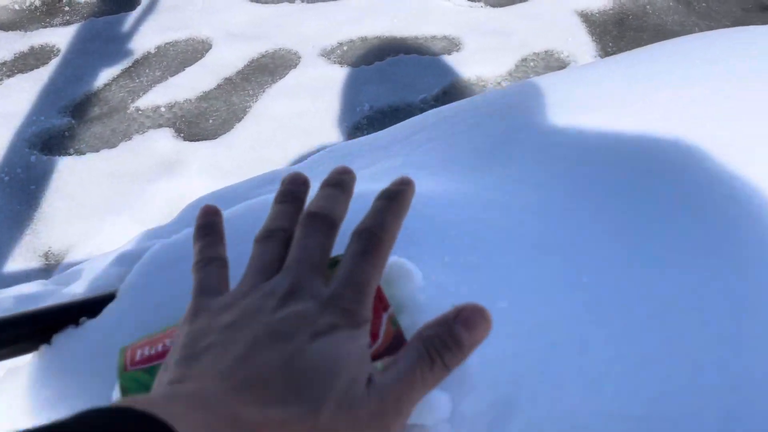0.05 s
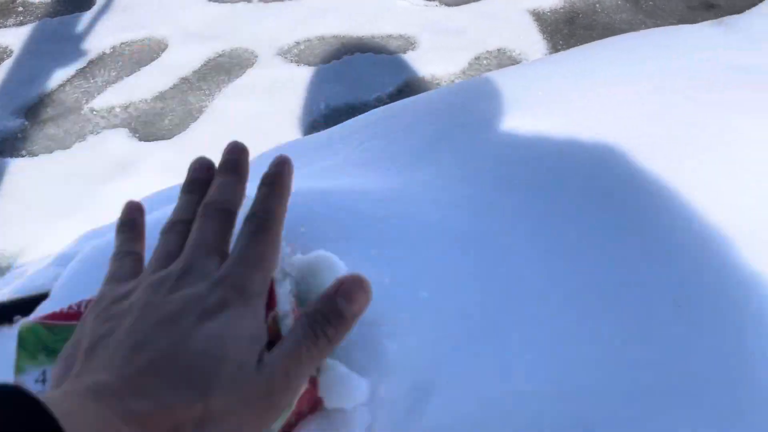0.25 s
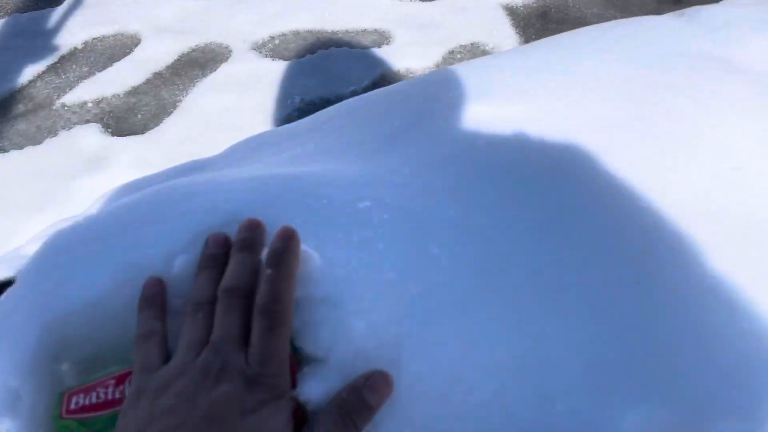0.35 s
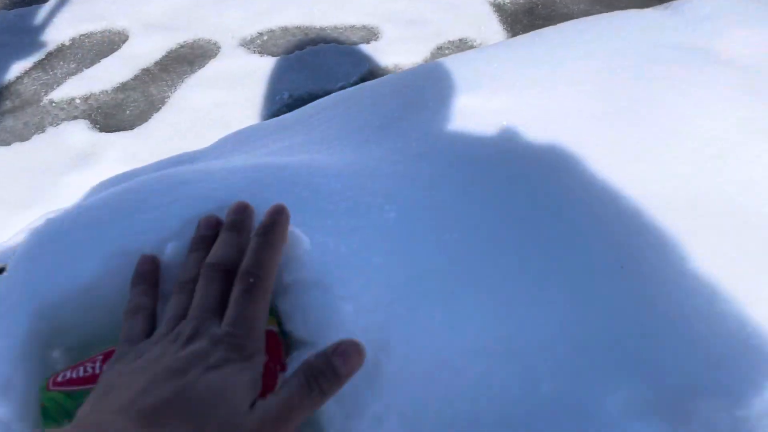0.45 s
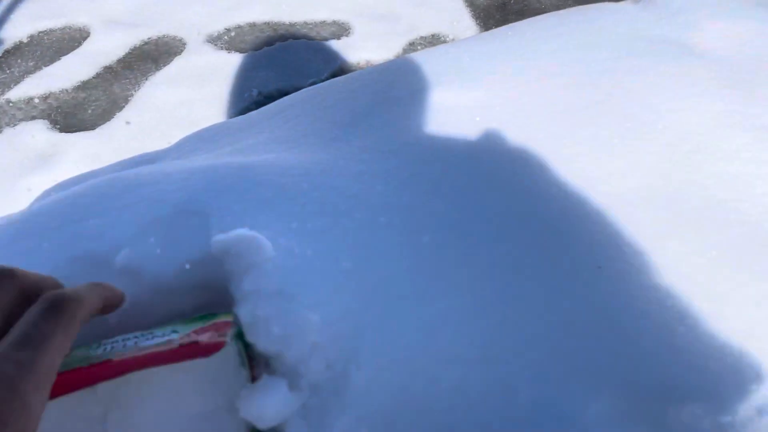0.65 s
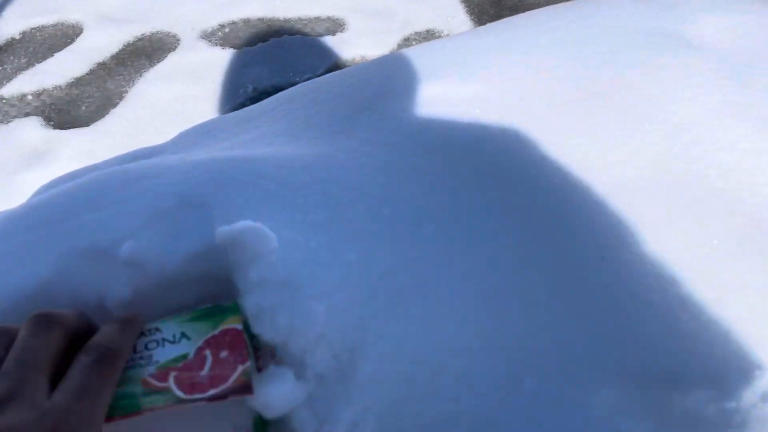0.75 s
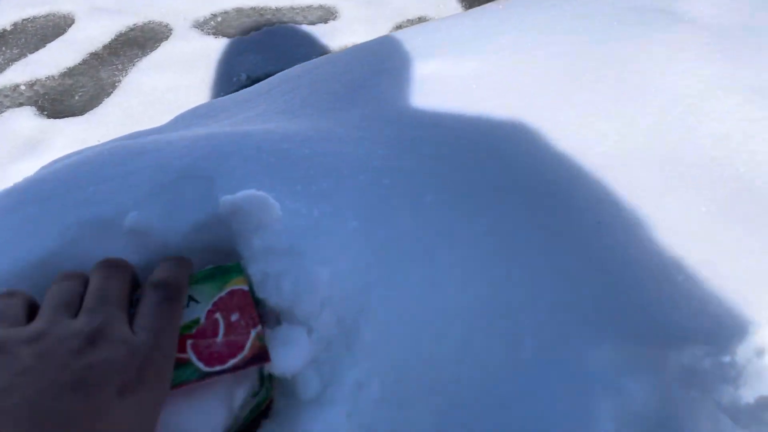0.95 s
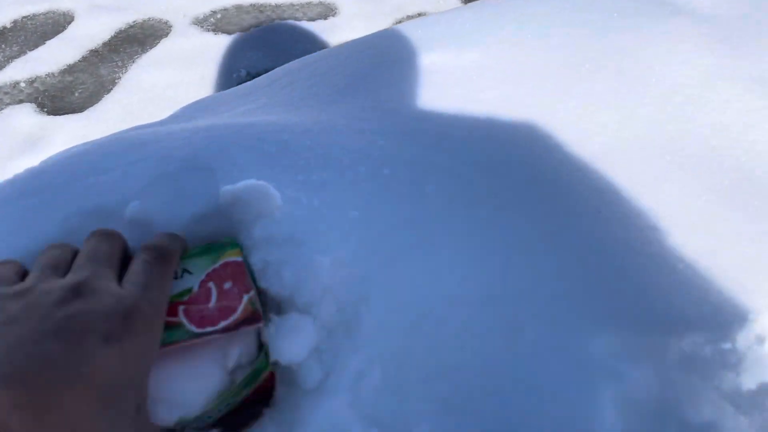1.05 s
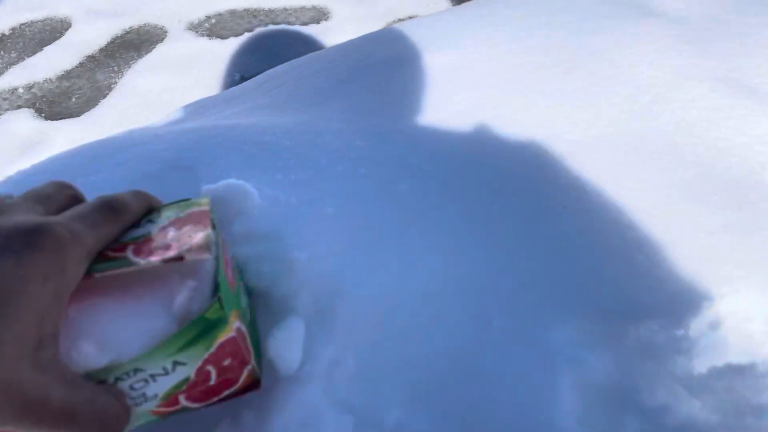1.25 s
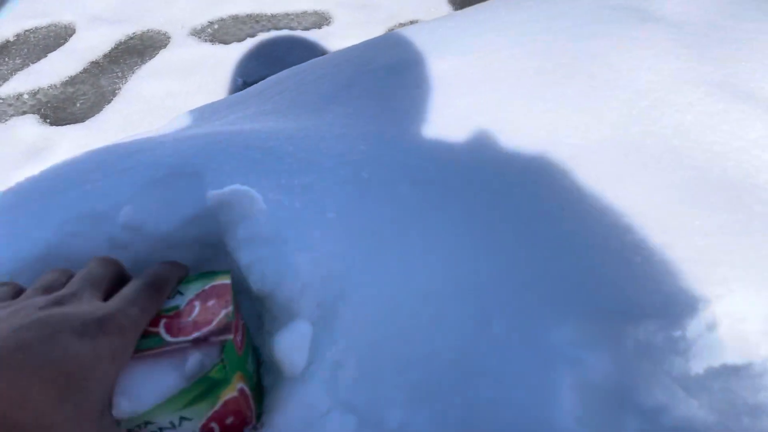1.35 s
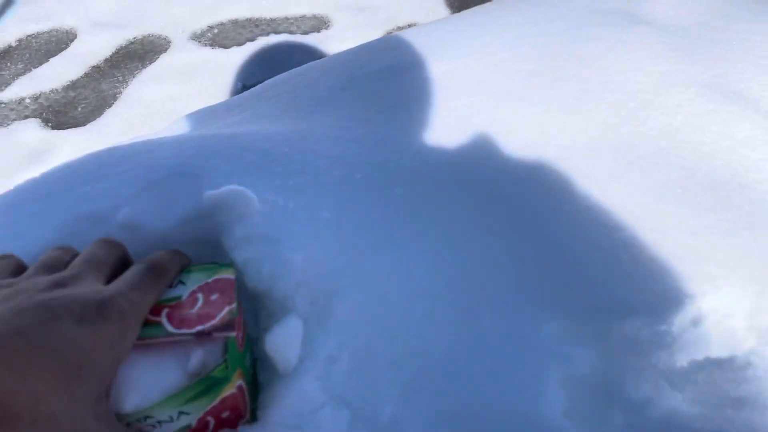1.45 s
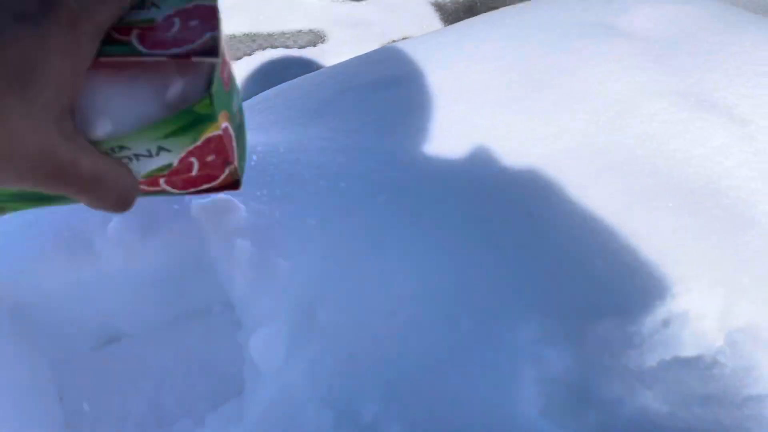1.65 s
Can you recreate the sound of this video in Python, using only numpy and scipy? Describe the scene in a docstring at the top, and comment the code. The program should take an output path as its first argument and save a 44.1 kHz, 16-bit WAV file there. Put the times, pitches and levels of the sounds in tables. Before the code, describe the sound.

Crunching and scraping as a cardboard carton is pushed into crusted snow by hand.

```python
"""A hand works a small carton into crusted snow, in the open air, near two closely spaced microphones.
First the cardboard snaps and slides lightly. A quarter of a second in comes a hard shove: a swarm of ice
grains breaks, hissing and rattling the panels, and the hollow box thumps against the packed snow.
Softer strokes then shift the carton, with scattered snaps. From about 1.25 seconds it is pressed down
with another crunch and a few last thumps."""
import sys
import numpy as np
from scipy import signal
from scipy.fft import rfft, irfft, next_fast_len
from scipy.io import wavfile
from scipy.ndimage import map_coordinates

SR = 44100
rng = np.random.default_rng(int(sys.argv[2]) if len(sys.argv) > 2 else 0)


def waveform_to_disk(signal):
    """Save audio, clipped to [-1, 1], as 16-bit WAV at the path in sys.argv[1]."""
    frames = np.transpose(np.atleast_2d(signal))
    scaled = np.clip(frames, -1, 1) * 32767
    samples = np.round(scaled).astype(np.int16)
    wavfile.write(sys.argv[1], SR, samples)


N = 74970

# The tone colour of breaking ice. Each row: frequency in Hz, relative level in dB.
ICE_SPECTRUM = [(100, -37), (500, -16.5), (1600, 1.5), (2600, -0.5), (4400, 1), (5900, -6), (7500, 0),
                (9700, 1), (11800, -7.5), (15000, -3.5)]
# The pitches at which the cardboard panels ring. Each row: frequency in Hz, width in Hz, boost in dB.
PANEL_RESONANCES = [(227.2, 13, 0), (305, 150, -3.5), (778, 52, 1.5), (952, 26, 5), (1155, 24, 1),
                    (1674, 76, 3.5), (1874, 18, 3), (2500, 60, 7), (3485, 130, 1.5), (4450, 170, 5.5)]


def amp(db):
    """Turn decibels into a number to multiply by."""
    return 10 ** (np.asarray(db) / 20)


def unit(x):
    """Scale x so that its average power is 1."""
    return x / np.sqrt(np.mean(x ** 2) + 1e-20)


def along(points, hz):
    """Read between (Hz, value) points on a logarithmic frequency scale."""
    freqs, values = np.transpose(points)
    return np.interp(np.log(hz + 1), np.log(freqs + 1), values)


def level(points):
    """Join (seconds, dB) points into a gain for every sample."""
    return amp(np.interp(np.arange(N) / SR, *np.transpose(points)))


def since(start):
    """Seconds gone by since start, zero before it."""
    return np.maximum(np.arange(N) / SR - start, 0)


def wobble(per_s):
    """A smooth curve through per_s random values each second."""
    return map_coordinates(rng.standard_normal(N), [np.arange(N) * per_s / SR])


def filtered(x, response):
    """Change the level and phase of each frequency in x by response(hz)."""
    size = next_fast_len(N + SR // 2)
    return irfft(rfft(x, size) * response(np.fft.rfftfreq(size, 1 / SR)), size)[..., :N]


def coloured(x, spectrum, resonances=(), size=8192):
    """Give x a tone colour and resonances, using a filter that keeps the power of white noise."""
    hz = np.fft.rfftfreq(size, 1 / SR)
    boost_db = sum(db / (1 + (2 * (hz - centre) / width) ** 2) for centre, width, db in resonances)
    cepstrum = irfft(np.log(amp(along(spectrum, hz) + boost_db)))
    # Folding this onto its first half makes the filter ring after a click, never before it.
    cepstrum[1:size // 2] *= 2
    cepstrum[size // 2 + 1:] = 0
    response = irfft(np.exp(rfft(cepstrum)))
    return signal.fftconvolve(x, response[None] / np.linalg.norm(response), axes=1)[:, :N]


def grains(per_s, spread_db):
    """Tiny random clicks in two rows: the part both microphones share, and the off-centre part."""
    sizes = amp(spread_db * np.clip(rng.standard_normal(N), -2, 2))
    signs = rng.choice([-1, 1], N)
    clicks = unit(sizes * signs * (rng.random(N) < per_s / SR))
    return np.array([clicks, clicks * rng.standard_normal(N)])


def ring(start, hz, fade_s, attack_s):
    """One vibration that fades by 60 dB in fade_s seconds, with no off-centre part."""
    t = since(start)
    envelope = amp(-60 * t / fade_s) * (1 - np.exp(-t / attack_s))
    return np.outer([1, 0], np.sin(2 * np.pi * hz * t) * envelope)


def hand_rumble():
    """The hand holding the box makes a low rumble."""
    # How the rumble swells and sinks. Each row: time in seconds, level in dB.
    loudness = [(0, -61), (0.1, -53), (0.2, -54.5), (0.29, -31.5), (0.49, -32), (0.56, -41), (0.65, -48),
                (0.75, -51), (0.81, -57), (1.03, -45.5), (1.15, -55.5), (1.3, -49.5), (1.47, -52.5),
                (1.6, -41.5), (1.7, -66)]
    # Its deep tone colour. Each row: frequency in Hz, relative level in dB.
    spectrum = [(20, -18), (45, -8), (70, 2), (110, -6.5), (200, -12.5), (400, -26.5), (2000, -60.5)]
    return level(loudness) * coloured(rng.standard_normal((2, N)), spectrum)


def sliding():
    """Cardboard and fingers rub lightly over loose snow, and single crumbs crackle."""
    # How strong the sliding is. Each row: time in seconds, level in dB.
    loudness = [(0, -50), (0.08, -51), (0.2, -62.5), (0.3, -46.5), (0.53, -51), (0.63, -48.5), (0.72, -54),
                (0.93, -45.5), (1.1, -52.5), (1.21, -53.5), (1.36, -47.5), (1.43, -58), (1.52, -60),
                (1.61, -62.5), (1.7, -64)]
    # The tone colours of rubbing and of crumbs. Each row: frequency in Hz, relative level in dB.
    rub_spectrum = [(60, -11), (300, 8), (900, 1.5), (1700, -1.5), (2400, -1), (4200, -5), (6500, -6),
                    (9500, -10), (12000, -7.5), (15500, -10)]
    crumb_spectrum = [(200, -29), (900, -1), (1700, 8.5), (2500, -12), (3800, 0), (6000, -8), (10000, -18),
                      (15000, -14)]
    pressure = level(loudness) * amp(1.4 * wobble(per_s=90))
    rub = coloured(pressure * grains(per_s=5400, spread_db=4), rub_spectrum, PANEL_RESONANCES)
    crumbs = coloured(pressure * grains(per_s=130, spread_db=6), crumb_spectrum)
    return rub + amp(-7.5) * crumbs


def thumps():
    """The box bumps on packed snow, and each bump rings briefly at a low pitch."""
    # Each row: start in seconds, level in dB, pitch in Hz, seconds to fade by 60 dB.
    bumps = [ (0.249, -16.5, 119, 0.13), (0.263, -12, 90, 0.15), (0.328, -17, 85, .16),
             (0.372, -18, 82, 0.19), (0.456, -22.5, 116.4, 0.25), (0.495, -17, 82, 0.087),
             (0.577, -34, 65, 0.4), (1.328, -29.5, 65.4, 0.16), (1.462, -31, 74, .08),
             (1.52, -20, 145, 0.056), (1.554, -27, 110, 0.076), (1.599, -39, 174.2, 0.08),
             (1.612, -31, 71, 0.071)]
    return sum(amp(db) * ring(start, hz, fade_s, attack_s=0.0051) for start, db, hz, fade_s in bumps)


def snaps():
    """A panel or a piece of crust gives way: a short crack and a ring that dies quickly."""
    # Each row: start in seconds, crack in dB, ring in dB, ring pitch in Hz, seconds to fade by 60 dB.
    breaks = [ (0.0155, -21.5, -7.5, 1530, 0.0035), (0.0418, -26.5, -21, 2050, 0.0086),
              (0.056, -38, -58, 3600, .006), (0.086, -53, -37, 1550, 0.012), (0.124, -56, -34, 1450, .008),
              (0.2476, -8.5, -7.5, 303, 0.06), (0.252, -7, -12, 957, 0.047),
              (0.2665, -10, -22, 1300, 0.0052), (0.323, -49, -24, 640, .02),
              (0.358, -29, -19.5, 1850, 0.0069), (0.395, -26.5, -35, 1780, 0.0049),
              (0.4443, -47, -28, 1540, 0.021), (0.452, -56, -29.5, 840, .016),
              (0.476, -37, -29, 3560, 0.0089), (0.538, -33, -35, 1710, 0.012),
              (0.7771, -37, -29.5, 1120, 0.0073), (0.794, -54, -32.5, 780, 0.022),
              (0.8175, -50, -31, 1530, 0.0072), (0.822, -48, -22.5, 950, 0.023),
              (0.8245, -52, -22, 683, 0.022), (0.9653, -20, -11, 3400, 0.0038),
              (0.9777, -45, -12, 2400, 0.0086), (1.009, -33, -10.5, 2440, 0.0074),
              (1.0096, -25, -26.5, 410, 0.047), (1.012, -39, -19, 1070, 0.018),
              (1.0137, -30, -7, 2350, 0.011), (1.273, -24, -22, 1110, 0.011),
              (1.3301, -17, -41, 1596, .006), (1.3388, -16, -20.5, 607, 0.011),
              (1.4166, -35, -59, 1500, .008), (1.4882, -41, -35.5, 750, 0.011),
              (1.492, -61, -32.5, 362, 0.017), (1.526, -65, -38, 290, 0.067),
              (1.5413, -26.5, -27, 1560, 0.0054), (1.582, -22.5, -30, 1617, 0.029),
              (1.589, -53, -24, 1675, .016)]
    crack_fade_s = 0.0075
    crack_level, rings = np.zeros(N), np.zeros((2, N))
    for start, crack_db, ring_db, hz, fade_s in breaks:
        age = since(start)
        crack_level += amp(crack_db - 60 * age / crack_fade_s) * (age > 0)
        rings += amp(ring_db) * ring(start, hz, fade_s, attack_s=0.00027)
    return coloured(crack_level * rng.standard_normal((2, N)), ICE_SPECTRUM) + rings


def strokes():
    """Each shaky push crushes ice grains and rattles the panels and the hollow of the carton."""
    # Each row: time of full force, then rise, hold and fall, all in seconds,
    # then the levels of ice crunch, cardboard rattle and hollow body in dB.
    pushes = [ (0.234, 0.0099, 0.011, .02, -24.5, -27, -28),
              (0.248, 0.012, 0.012, 0.021, -16.5, -15.5, -19.5),
              (0.266, 0.0093, 0.015, 0.082, -24.5, -32.5, -42), (0.321, .008, .035, .014, -38, -41, -39.5),
              (0.433, 0.1, 0.046, 0.079, -48.5, -49, -63), (0.45, 0.0087, 0.043, 0.038, -67, -40, -29.5),
              (0.535, .012, .01, 0.026, -46.5, -52, -51), (0.734, 0.12, .03, 0.12, -45.5, -59, -55),
              (0.775, 0.0045, 0.03, 0.019, -45, -46, -57), (0.818, 0.0071, 0.0098, 0.02, -41.5, -37.5, -50),
              (0.871, 0.019, 0.044, 0.034, -45.5, -44, -48.5), (0.966, 0.0044, 0.018, 0.016, -32, -36, -65),
              (1.007, 0.0026, 0.0095, 0.014, -27, -36.5, -42.5),
              (1.022, 0.014, 0.0034, 0.11, -50, -46.5, -53), (1.162, 0.11, .012, 0.026, -41, -60.5, -59),
              (1.256, 0.039, .023, .02, -33.5, -45, -70), (1.279, 0.0055, 0.0098, 0.044, -21, -36.5, -58),
              (1.297, 0.012, 0.0055, 0.053, -27.5, -34, -38.5),
              (1.332, 0.0017, 0.009, 0.026, -37, -37, -61), (1.45, 0.023, 0.041, 0.025, -51.5, -55, -58),
              (1.552, 0.02, 0.018, 0.025, -33, -56, -47.5), (1.58, .004, 0.011, 0.01, -34, -53.5, -59)]
    # The tone colours of the cardboard and the hollow. Each row: frequency in Hz, relative level in dB.
    card_spectrum = [(100, -0.5), (350, -1.5), (700, 1.5), (1100, -2), (1800, -7), (3000, -16), (6000, -29),
                     (16000, -31.5)]
    hollow_spectrum = [(40, -30.5), (120, 0.5), (180, -4.5), (240, -0.5), (360, -0.5), (600, -13),
                       (1200, -25), (5000, -65)]
    edge_db = 30  # how far the level moves during a rise or a fall
    t, power = np.arange(N) / SR, np.zeros((3, N))
    for peak, rise, hold, fall, *levels_db in pushes:
        force_db = -edge_db * (np.maximum(peak - t, 0) / rise + since(peak + hold) / fall)
        power += amp(np.array(levels_db)[:, None] + force_db) ** 2
    judder = unit(amp(1.7 * wobble(per_s=300)))
    ice, card, hollow = np.sqrt(power) * judder
    crunch = coloured(ice * grains(per_s=12000, spread_db=3.5), ICE_SPECTRUM, PANEL_RESONANCES)
    rattle = coloured(card * grains(per_s=2500, spread_db=7), card_spectrum, PANEL_RESONANCES)
    body = coloured(hollow * grains(per_s=2500, spread_db=7), hollow_spectrum, PANEL_RESONANCES)
    return crunch + rattle + body


def scene():
    """All the sounds together, as the left and right microphones each hear them."""
    # Each row: frequency in Hz, how far the left side runs ahead of the right in radians.
    left_lead = [(20, 0), (300, .15), (1100, .7), (1850, .7), (2200, 3.3), (3700, 6.3), (5300, 6.7),
                 (6200, 5.3), (7900, 3.3), (9600, 2.8), (11000, 1.6), (12300, .15), (16000, 0)]
    # Each row: frequency in Hz, how much louder the left side is than the right in dB.
    balance = [(60, 1), (170, 1.5), (400, 4), (1200, 3), (1900, -4.5), (2500, 0), (3500, -1), (5200, 2.5),
               (6500, .5), (16000, 0)]
    # How wide the sound is. Each row: frequency in Hz, gain of the off-centre part in dB.
    width = [(60, -12.5), (200, -10.5), (500, -8), (1200, -9), (2300, -8.5), (5000, -6), (7000, -7),
             (9000, -19.5), (14000, -20.5)]
    shared, off_centre = strokes() + snaps() + thumps() + hand_rumble() + sliding()
    off_centre = filtered(off_centre, lambda hz: amp(along(width, hz)))
    left_right = np.array([shared + off_centre, shared - off_centre])
    half = np.array([[.5], [-.5]])  # each side takes half, in opposite directions
    return filtered(left_right,
                    lambda hz: amp(half * along(balance, hz)) * np.exp(1j * half * along(left_lead, hz)))


def record(dry):
    """The recorder cuts the deepest bass, rounds off the tallest peaks and drops the highest treble."""
    low_cut_hz, ceiling_db, top_hz = 40, -1.2, 15950
    cut = signal.sosfilt(signal.butter(2, low_cut_hz, "highpass", fs=SR, output="sos"), dry)
    rounded = cut / (1 + (cut / amp(ceiling_db)) ** 6) ** (1 / 6)
    return filtered(rounded, lambda hz: 1 / np.sqrt(1 + (hz / top_hz) ** 240))


dry = scene()
out = record(dry)
waveform_to_disk(out)
```